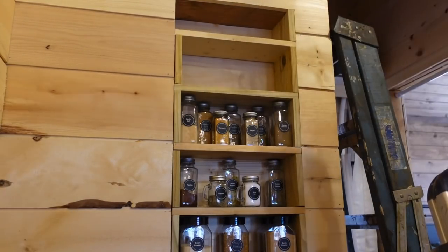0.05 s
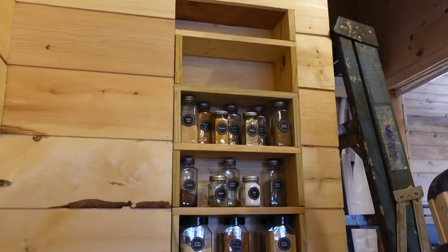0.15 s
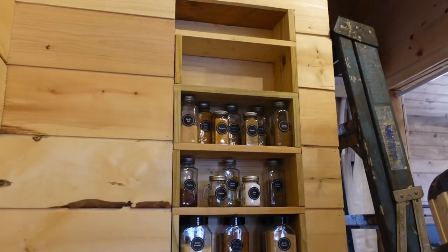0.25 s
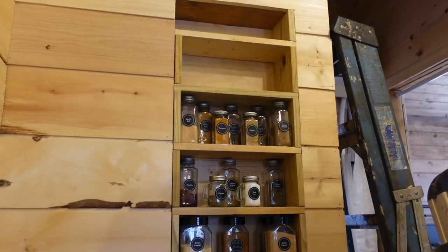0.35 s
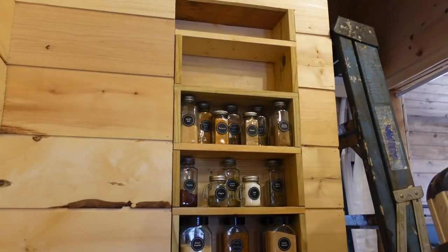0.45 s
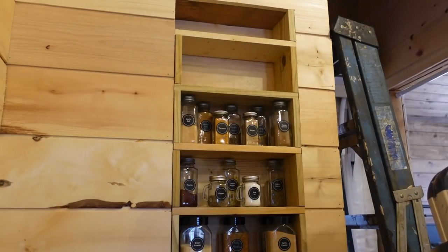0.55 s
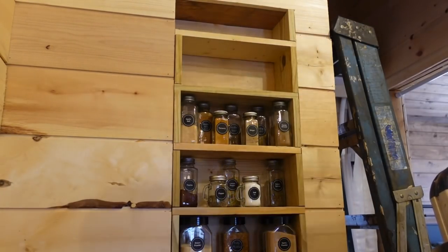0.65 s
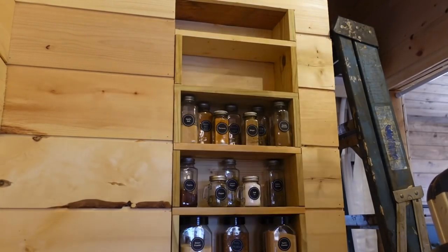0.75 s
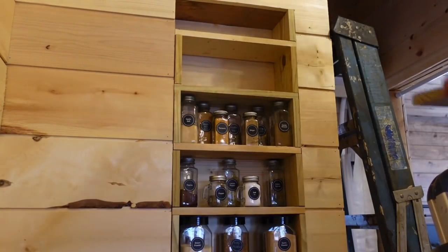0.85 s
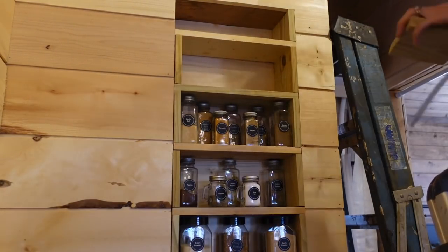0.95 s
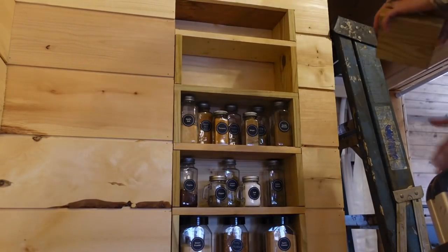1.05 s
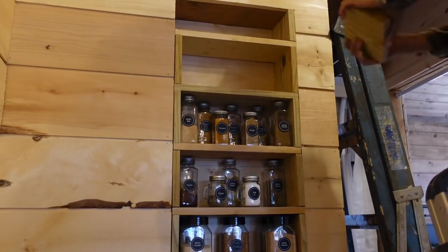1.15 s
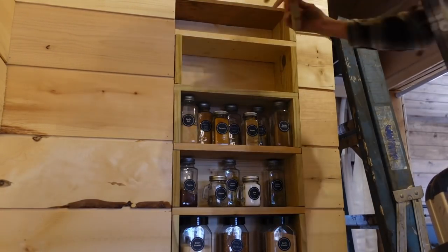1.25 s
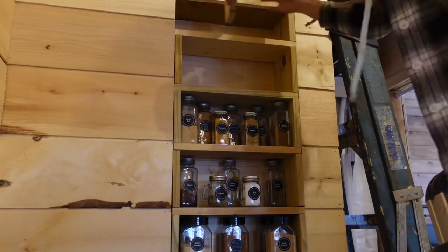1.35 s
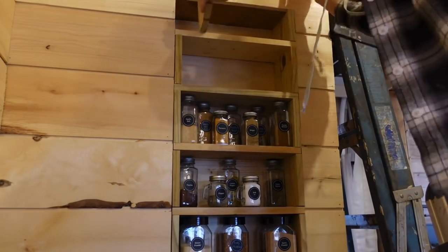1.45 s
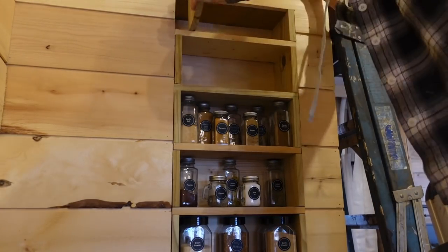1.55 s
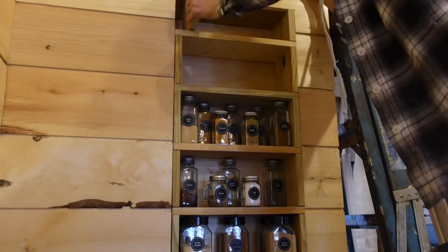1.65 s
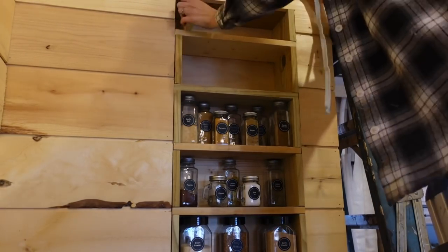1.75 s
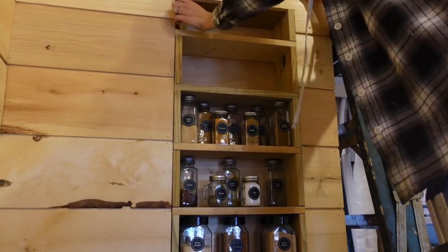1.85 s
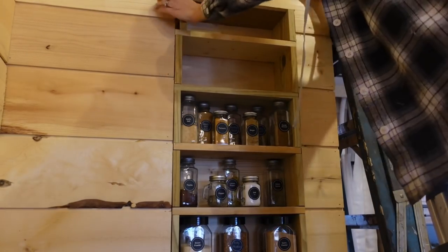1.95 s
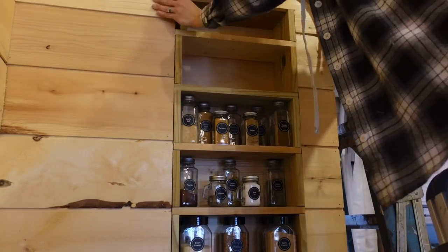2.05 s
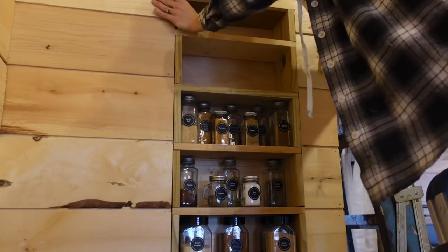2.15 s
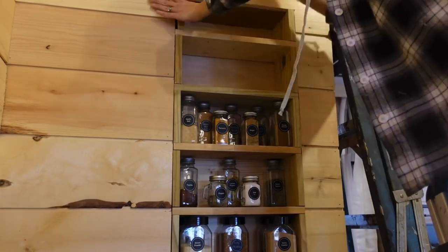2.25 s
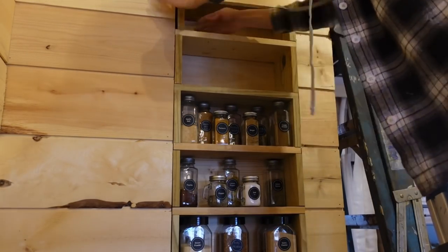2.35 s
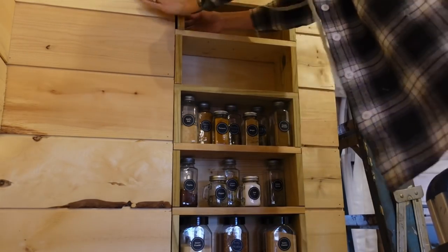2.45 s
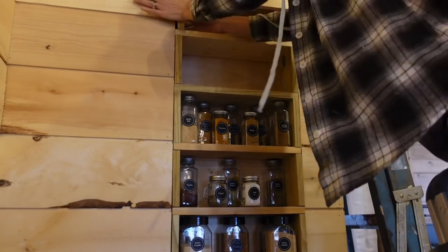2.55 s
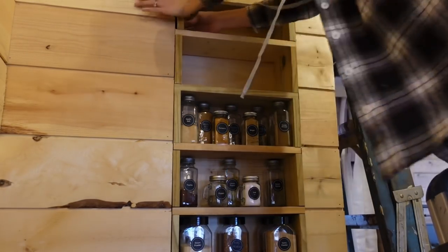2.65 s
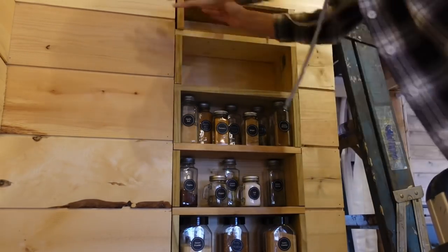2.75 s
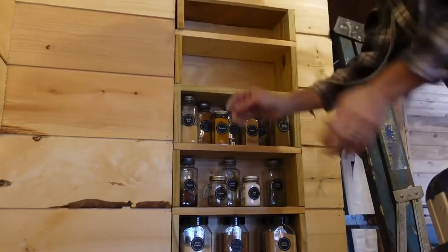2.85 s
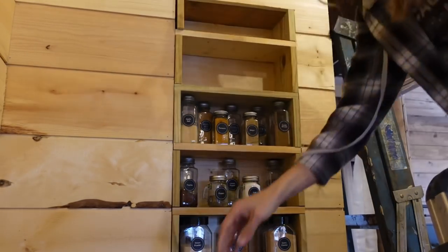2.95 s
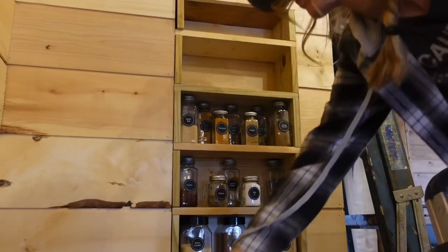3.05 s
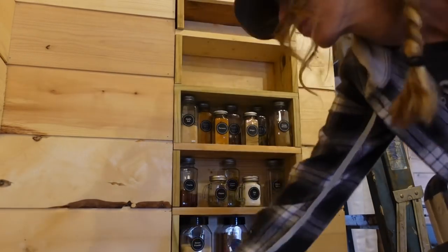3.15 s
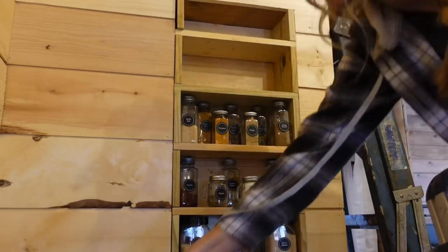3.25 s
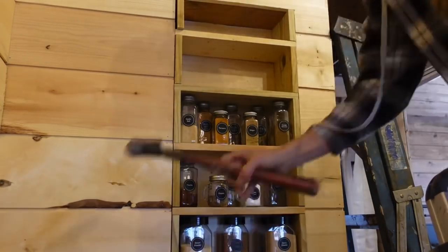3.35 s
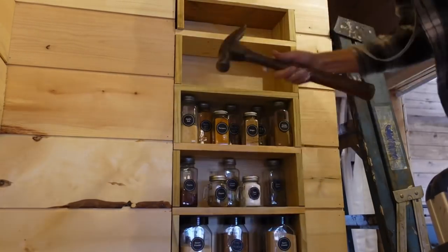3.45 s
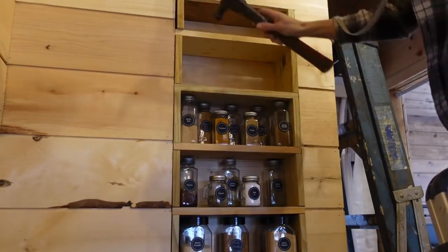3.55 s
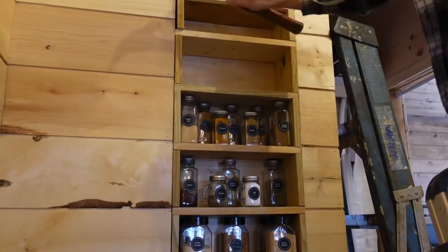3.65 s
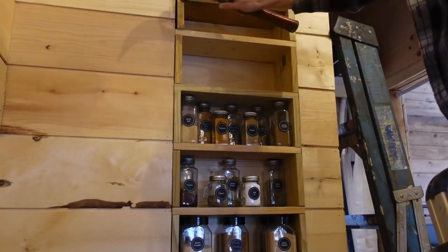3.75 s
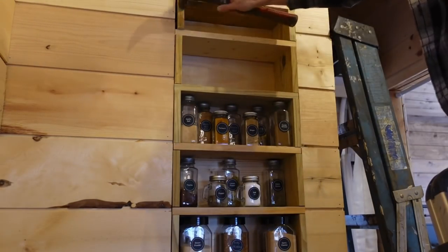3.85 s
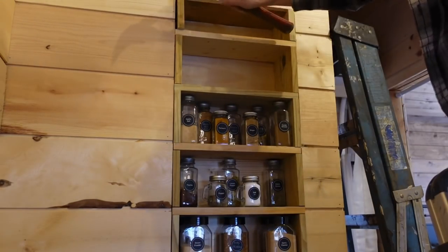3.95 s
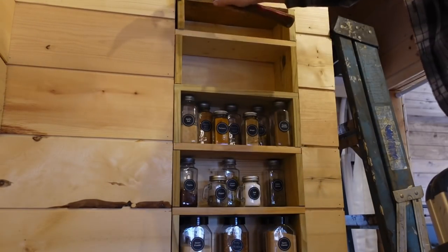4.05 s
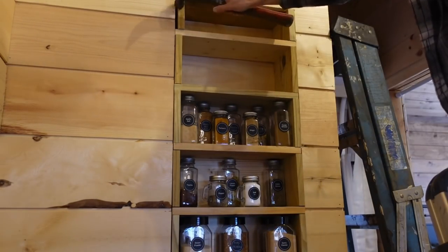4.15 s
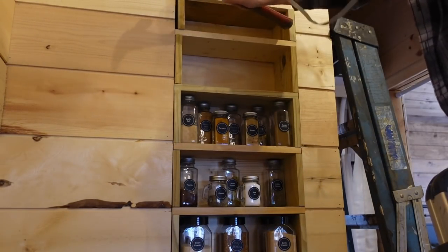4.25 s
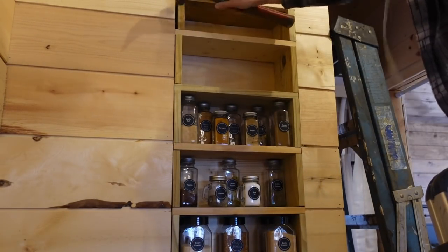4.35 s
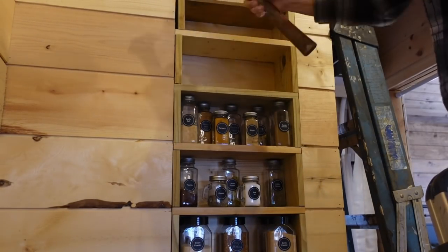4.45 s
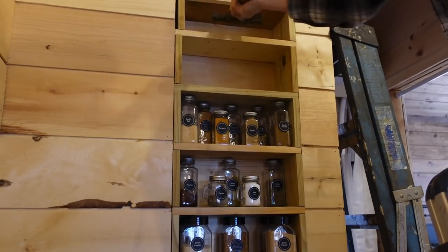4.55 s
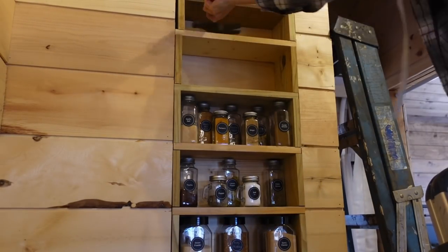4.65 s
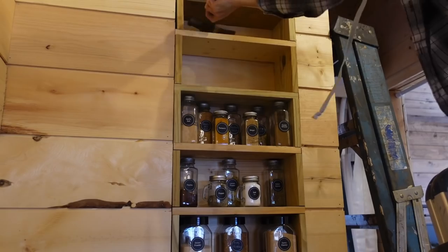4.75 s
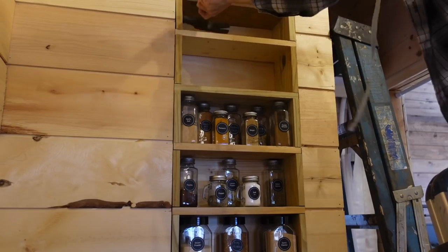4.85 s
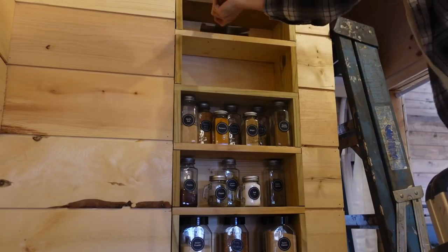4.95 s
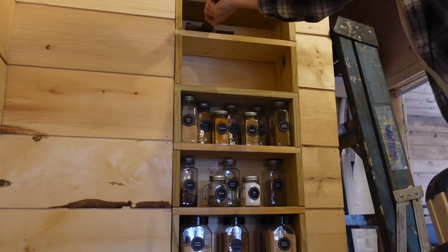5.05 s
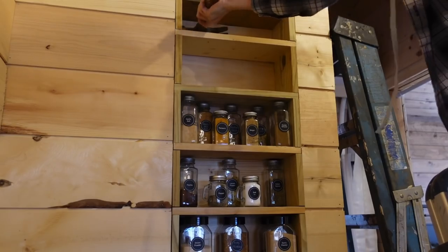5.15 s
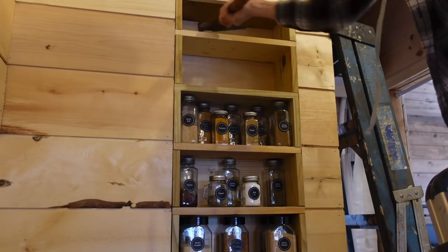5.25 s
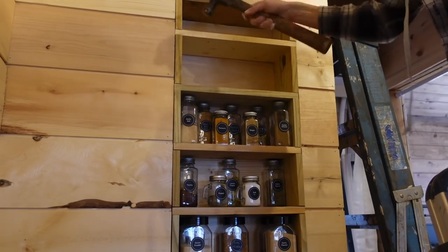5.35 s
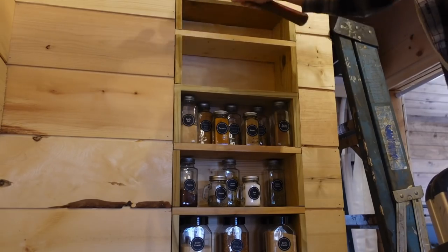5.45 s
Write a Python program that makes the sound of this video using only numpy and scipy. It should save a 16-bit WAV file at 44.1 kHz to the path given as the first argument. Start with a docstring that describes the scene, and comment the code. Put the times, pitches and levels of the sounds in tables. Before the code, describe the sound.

A close microphone in a small, dry, wood-lined room. Under everything are quiet air, a faint low hum and soft rumbles as a person shifts weight. From 0.1 to 1.1 s a loose wooden strip gives muffled, hollow bumps, firmer around 0.6, 0.76 and 1.1, among tiny ticks and sleeve brushes. At 1.5-1.9 s comes a tight cluster of louder wooden clunks with a scrape; short rubs follow near 2.1 and a click and scuff at 2.6. Only light ticks and cloth rustle fill 2.8-3.6. At 3.73 hammering starts abruptly: five heavy blows about 0.15 s apart until 4.33, booming through the wall and overloading the microphone. After a gap, four lighter, brighter, steelier hits fall from 4.7 to 5.19, the last sharpest, with the strip clattering between. Each blow cracks, rings briefly and drops in pitch along the boards. The last ring fades into quiet room air.

```python
"""In a small plank-lined room, close to the microphone, a wooden strip is fitted to the top of a shelf.
It knocks and scrapes into place (struck modes, noise that dies in the room, friction) and sleeves rustle.
Then a hammer drives it home: five heavy blows that shake the wall and four lighter, more metallic ones,
each a crack, ringing modes and clatter, with a falling tone along the boards.
The blows overload the microphone; a faint hum, room air and a low rumble lie underneath."""
import sys
import numpy as np
from scipy import signal
from scipy.fft import rfft, irfft, next_fast_len
from scipy.io import wavfile

SR = 44100
rng = np.random.default_rng(int(sys.argv[2]) if len(sys.argv) > 2 else 0)


def unload_wav(signal):
    """Save mono or channel-first audio to the path in sys.argv[1] as 16-bit WAV at rate SR, clipped to [-1, 1]."""
    wavfile.write(
        sys.argv[1],
        SR,
        np.round(np.clip(np.atleast_2d(signal).T, -1, 1) * 32767).astype(np.int16),
    )


N = 242991
RING_S = np.arange(18000) / SR  # time axis of one struck sound, in seconds

# Hammer blows, close to the microphone. Each row: start in seconds, relative strength in dB,
# brightness in dB per octave, relative wall boom in dB, relative steel ring in dB,
# ping of the struck spot in Hz, ping level in dB.
BLOWS = [(3.73, 2.5, -2.5, 2.5, -33, 384, -7), (3.8767, 5.5, -2.5, 10, -25.5, 3427, -8),
         (4.0177, 9, -0.68, 12, -25.5, 2560, -4.5), (4.1673, 7, -.5, 12, -9.5, 1240, -28),
         (4.333, 6, -1.25, 9, -37.5, 612, -12.5), (4.704, 0.9, -1.34, -5, -0.5, 2055, -4),
         (4.8756, 1.5, -0.07, -3.5, -0.5, 607, -12), (5.0313, -4.5, 1.3, -6.5, -.5, 6760, -20),
         (5.187, 6, 3, -0.5, 2.5, 6700, -5)]
# Modes of wall and shelf. Each row: frequency in Hz, relative level in dB, T60 in seconds.
WALL_MODES = [(53.4, -39, .65), (122.5, -23, .17), (150, -26, .17), (214, -19, .11), (243, -11, .065),
              (300, -15, .07), (378, -13, .06), (433, -23, .16), (505, -23, .08), (590, -21, .07),
              (622, -20, .07), (715, -25, .09), (969, -24, .08), (1086, -24, .1), (1225, -24, .08),
              (1326, -19, .09), (1400, -27, .12), (1564, -22, .09), (1763, -23, .11), (1950, -26, .1),
              (2160, -23, .08), (2480, -22, .1), (2680, -22, .1), (2830, -25, .1), (3236, -23, .07),
              (3320, -22, .08), (3966, -27, .1), (4650, -26, .05), (6300, -28, .05), (9800, -27, .04)]
# Modes of hammer head, nail and the strip that holds it. Each row: frequency in Hz, relative level in dB,
# T60 in seconds.
STEEL_MODES = [(340, -22, .06), (400, -21, .06), (470, -21, .07), (1763, -20, .1), (2190, -19, .07),
               (2284, -14, .085), (2320, -25, .19), (2380, -19, .11), (2478, -25, .13), (2780, -24, .11),
               (3020, -21, .06), (3236, -20, .07), (3900, -24, .06), (4450, -26, .05), (4900, -24, .06),
               (6980, -27, .06), (8700, -30, .06)]
# The crowd of finer resonances in a blow. Each row: frequency in Hz, relative density in dB per Hz.
CLATTER = [(30, -38), (80, -18.5), (130, -11.5), (300, 2.5), (600, 1.5), (820, -1), (1400, 1), (2400, -3.5),
           (3300, -1.5), (4500, -5.5), (7000, -10), (10000, -14), (16000, -26.5)]
# The contact itself. Each row: frequency in Hz, relative density in dB per Hz.
CRACK = [(100, -35), (500, -18.5), (2500, -24.5), (7000, -3.5), (16000, -19.5)]


def hammer(alike=0.62, rise_s=0.000043, wall_db=-5.0, clatter_db=-9, crack_db=-17,
           crack_t60=0.0094, ping_t60=0.031):
    """Each blow is a brief crack, the modes of wall and steel, and a clatter that dies away in the room."""
    out = np.zeros(N)
    same_spot = rng.standard_normal(len(RING_S))
    rise = 1 - np.exp(-RING_S / rise_s)
    for s, strength_db, brightness, boom_db, steel_db, ping_hz, ping_db in BLOWS:
        colour = blow_colour(strength_db, brightness, boom_db)

        # blows land near one another, so they share much of their fine structure
        own_spot = rng.standard_normal(len(RING_S))
        noise = coloured(np.sqrt(alike) * same_spot + np.sqrt(1 - alike) * own_spot, CLATTER)
        clatter = from_db(clatter_db) * dying(tinted(noise, colour), early_t60=0.047, room_db=-12.5)

        contact = coloured(rng.standard_normal(len(RING_S)), CRACK) * fade(crack_t60)
        crack = from_db(crack_db + at_hz(colour, CRACK_HZ)) * contact

        wall = from_db(wall_db) * ringing(WALL_MODES, colour, scatter_db=4.5, spread_s=0.00065)
        flat = [(1, 0.017)]  # one point: the same gain at every frequency
        steel = from_db(steel_db) * ringing(STEEL_MODES, flat, scatter_db=0.5, spread_s=0.0011)
        ping = from_db(ping_db) * np.sin(2 * np.pi * ping_hz * RING_S) * fade(ping_t60)

        echoed = shelf_echoes(rise * (crack + clatter), share=0.12)
        add(out, s, echoed + wall + steel + ping)
    return high_pass(out, hz=49.7)


BOOM_HZ, THUMP_HZ, CLACK_HZ, CRACK_HZ = 55, 285, 1200, 8950  # landmarks of a blow's colour
FLANK_DB_PER_OCTAVE = 1.2  # from thump to crack, the tilt aside, level falls off both sides of the clack
THUMP_FOLLOWS_BOOM = 0.16  # share of the wall's boom that carries over into the board's thump


def blow_colour(strength_db, brightness, boom_db):
    """A harder contact tilts the blow towards the treble; a blow that shakes the wall also thumps more."""
    octaves = np.log2(np.array([THUMP_HZ, CLACK_HZ, CRACK_HZ]) / CLACK_HZ)
    thump, clack, crack = strength_db + brightness * octaves - FLANK_DB_PER_OCTAVE * abs(octaves)
    thump = thump + THUMP_FOLLOWS_BOOM * (boom_db - strength_db)
    return [(BOOM_HZ, boom_db), (THUMP_HZ, thump), (CLACK_HZ, clack), (CRACK_HZ, crack)]


# The loose strip knocking on the shelf. Each row: start in seconds, relative level in dB,
# centre in Hz, focus on that centre in dB per octave.
KNOCKS = [(0.099, -26.5, 300, 2), (0.174, -21, 220, 32), (0.2963, -15, 199, 2), (0.602, -9, 245, 15.5),
          (.713, -18.5, 500, 3), (.76, -6, 248, 20.5), (1.092, -8, 246, 17), (1.4895, -1, 490, 6),
          (1.563, -2.5, 670, 8), (1.686, 0, 680, 22), (1.7307, -4.5, 400, 2), (1.868, -23.5, 1100, 6),
          (2.607, -27.5, 1000, -7), (2.81, -19.5, 470, 36), (4.732, -3, 800, 1), (4.989, -6.5, 485, 8),
          (5.051, 0.5, 600, 0.5), (5.0837, -1, 650, 8)]
# Modes of the strip. Each row: frequency in Hz, relative level in dB, T60 in seconds.
STRIP_MODES = [(229, -30.5, 0.054), (306, -29, 0.046), (421, -32, 0.11), (508.6, -25, 0.07),
               (604.6, -26, 0.069), (712, -39, 0.091), (1125, -42, 0.13), (1660, -50, 0.0504)]
# The strip's finer resonances. Each row: frequency in Hz, relative density in dB per Hz.
STRIP_CLATTER = [(40, -42), (120, -10.5), (220, -8), (550, -11.5), (850, -9.5), (1400, -10.5),
                 (3000, -14.5), (6000, -33.5), (16000, -43)]


def knocks(clatter_db=-26, soft_rise_s=0.0099):
    """The strip bumps the shelf; each place of contact favours its own pitch, and gentle bumps start softly."""
    out = np.zeros(N)
    for s, db, centre_hz, focus in KNOCKS:
        colour = [(hz, -focus * abs(np.log2(hz / centre_hz))) for hz, _ in STRIP_CLATTER]
        noise = coloured(rng.standard_normal(len(RING_S)), STRIP_CLATTER)
        clatter = from_db(clatter_db) * dying(tinted(noise, colour), early_t60=0.069, room_db=-5.5)
        body = ringing(STRIP_MODES, colour, scatter_db=1.5, spread_s=0.00056)
        softness = np.clip(-db / 25, .05, 1)
        rise = 1.5 - np.exp(-RING_S / (soft_rise_s * softness))  # gain from 0.5 towards 1.5
        add(out, s, from_db(db) * rise * (body + clatter))
    return high_pass(out, hz=147)


# Bending waves in the long boards, set off by leaning and pushing. Each row: start in seconds,
# length in seconds, first pitch in Hz, last pitch in Hz, level in dB before the flutter.
BENDS = [(.795, 0.19, 92.8, 61, -47), (1.085, .22, 98, 59, -41.5), (1.576, 0.097, 480, 376, -41.5),
         (1.631, 0.07, 380, 143, -41.5)]
# every hammer blow sends a like wave along the boards, a little different each time
BLOW_BEND_DELAY_S, BLOW_BEND_S = .008, .115  # length before scatter
BLOW_BEND_FROM_HZ, BLOW_BEND_TO_HZ, BLOW_BEND_DB = 210, 67, -38.5  # pitches before scatter
BEND_SCATTER = 0.073  # share of length and pitch
BEND_FLUTTER, BEND_FLUTTERS_PER_S = 0.46, 70  # share of height; rate of random points


def bends():
    """A bending wave arrives highs first: a short falling tone, fluttering as it crosses its reflections."""
    out, waves = np.zeros(N), list(BENDS)
    for s, *_ in BLOWS:
        stretch, pitch = np.exp(BEND_SCATTER * rng.standard_normal(2))
        from_hz, to_hz = BLOW_BEND_FROM_HZ * pitch, BLOW_BEND_TO_HZ * pitch
        waves.append((s + BLOW_BEND_DELAY_S, BLOW_BEND_S * stretch, from_hz, to_hz, BLOW_BEND_DB))
    for s, length, from_hz, to_hz, db in waves:
        hz = np.geomspace(from_hz, to_hz, int(length * SR))
        tone = np.sin(2 * np.pi * np.cumsum(hz) / SR)
        add(out, s, from_db(db) * np.hanning(len(hz)) * tone)
    return out * (1 + BEND_FLUTTER * wander(BEND_FLUTTERS_PER_S))


# The strip sliding over the boards. Each row: start in seconds, length in seconds,
# level in dB before the layer's trim.
SLIDES = [(1.57, 0.28, -46.5), (1.745, 0.068, -36.5), (2.066, 0.067, -37), (2.13, 0.031, -41.5),
          (2.18, 0.019, -44), (2.535, 0.053, -51.5), (2.594, 0.016, -32.5), (3.185, .04, -51.5)]
# Colour of wood on wood. Each row: frequency in Hz, relative density in dB per Hz.
SLIDE_COLOUR = [(80, -10), (200, -1), (450, 0), (800, -3), (1150, -3), (1340, 1.5), (1500, -3),
                (2500, -7.5), (3500, -11), (6000, -19), (10000, -21), (16000, -37.5)]


def slides(trim_db=-1):
    """Wood slides on wood: friction noise that swells as a push takes hold, then slows and stops."""
    push = strokes(SLIDES, attack_s=0.013, sag_db_per_s=78, release_db_per_s=452)
    rub = friction(SLIDE_COLOUR, grains_per_s=1500, grain_db=-7, catch_db=1.5)
    return from_db(trim_db) * push * shelf_echoes(rub, share=0.41)


# Light ticks of buttons and tools. Each row: start in seconds, level in dB before the layer's trim.
TICKS = [(0.331, -38), (.597, -42), (0.7558, -37), (1.181, -42.5), (1.256, -44), (1.916, -44), (1.973, -45),
         (2.026, -46), (2.601, -31.5), (2.7496, -43), (3.078, -42.5), (3.1681, -35), (3.384, -34.5),
         (3.5892, -47.5), (4.638, -44.5)]
# Colour of a tick. Each row: frequency in Hz, relative density in dB per Hz.
TICK_COLOUR = [(300, -10), (1500, -3.5), (4000, 2), (8000, -2.5), (12000, -6.5), (16000, -5)]


def ticks(trim_db=-7):
    """Small hard touches: short noise bursts, heard mostly through the room."""
    out = np.zeros(N)
    for s, db in TICKS:
        noise = coloured(rng.standard_normal(len(RING_S)), TICK_COLOUR)
        add(out, s, from_db(db + trim_db) * dying(noise, early_t60=0.011, room_db=-5))
    return out


# Shirt sleeves brushing. Each row: start in seconds, length in seconds, level in dB before the layer's trim.
SLEEVES = [(.26, 0.037, -49.5), (.586, 0.026, -37), (.7, 0.061, -50.5), (1.54, 0.014, -51),
           (1.62, 0.14, -52.5), (1.735, 0.066, -51), (2.066, 0.094, -43.5), (2.595, 0.011, -40),
           (3.16, 0.022, -48), (3.27, .04, -56), (3.379, 0.011, -40.5)]
# Colour of the cloth. Each row: frequency in Hz, relative density in dB per Hz.
SLEEVE_COLOUR = [(710, -49.5), (1200, -2.5), (2950, -2), (5130, -4), (6030, 5), (8260, -2), (11700, 4.5),
                 (16000, -10)]


def sleeves(trim_db=-4):
    """Cloth brushes: grainy friction noise under short strokes; between them, faint random swells of hiss come
    and go."""
    brush = strokes(SLEEVES + faint_hisses(), attack_s=0.0086, sag_db_per_s=83, release_db_per_s=350)
    rub = friction(SLEEVE_COLOUR, grains_per_s=2200, grain_db=-3)
    return from_db(trim_db) * brush * shelf_echoes(rub, share=0.19)


def faint_hisses(count=18, until_s=3.4, length_s=0.053, mean_db=-57.5, scatter_db=1):
    """Faint short swells of hiss at random times: start in seconds, length in seconds, dB before the trim."""
    rows = []
    for k in range(count):
        start = until_s * (k + rng.random()) / count
        length = length_s * rng.uniform(.5, 1.84)
        rows.append((start, length, mean_db + scatter_db * rng.standard_normal()))
    return rows


# Shifts of weight, each a low swell. Each row: middle in seconds, length in seconds,
# level in dB before the layer's trim.
SHIFTS = [(.08, 0.43, -46.5), (.45, 0.53, -41.5), (.83, 0.56, -46.5), (1.19, 0.39, -53), (2.62, 0.16, -43),
          (2.68, 0.38, -49.5), (3.3, 0.64, -57.5)]
# Colour of the rumble. Each row: frequency in Hz, relative density in dB per Hz.
RUMBLE_COLOUR = [(8.8, -28.5), (15, -10.5), (32, 14), (48, -8), (75, 0), (140, -11), (161, -45.5),
                 (200, -13), (260, -44), (440, -120)]


def rumble(rest_db=-62, trim_db=-3):
    """Shifting weight rumbles: low noise at a faint resting level, with slow swells."""
    gain = from_db(rest_db) + swells(SHIFTS)
    return from_db(trim_db) * gain * coloured(rng.standard_normal(N), RUMBLE_COLOUR)


# The hum in the room. Each row: frequency in Hz, level in dB rms.
HUM = [(76, -66.5), (241, -76.5), (371, -74.5)]
# Colour of the still air. Each row: frequency in Hz, relative density in dB per Hz.
AIR = [(12, -17), (20, 3.5), (74, -4), (120, -12.5), (163, -19.5), (357, -14.5), (849, -24), (1330, -24.5),
       (1660, -22.5), (3070, -25), (6360, -30), (14700, -40), (16000, -42)]


def background(air_db=-62):
    """Still room air as steady noise, with a faint hum of steady sines."""
    out = from_db(air_db) * coloured(rng.standard_normal(N), AIR)
    for hz, db in HUM:
        cycles = hz * np.arange(N) / SR + rng.random()
        out += from_db(db) * np.sqrt(2) * np.sin(2 * np.pi * cycles)
    return out


# How long the room rings. Each row: frequency in Hz, T60 in seconds.
ROOM_T60 = [(60, 0.91), (150, 0.34), (400, 0.18), (900, .16), (2400, 0.2), (6000, 0.14), (16000, 0.16)]


def dying(noise, early_t60, room_db):
    """Dense vibration dies fast in the wood and lingers in the room, longest in the bass."""
    octave = np.log2(np.clip(np.fft.rfftfreq(len(noise), 1 / SR), 2 ** 6, 2 ** 14))
    spectrum, early, out = rfft(noise), fade(early_t60), 0
    for k in range(6, 15):  # overlapping octave bands, 64 Hz to 16 kHz
        band = irfft(spectrum * np.maximum(1 - abs(octave - k), 0))
        late = from_db(room_db) * fade(at_hz(ROOM_T60, 2 ** k))
        out = out + band * np.hypot(early, late)
    return out


def ringing(modes, colour, scatter_db, spread_s):
    """Struck modes; each has a strength of its own and arrives by a slightly different path."""
    out = np.zeros(len(RING_S))
    for hz, db, t60 in modes:
        lag = int(rng.random() * spread_s * SR)
        swing = np.cos(2 * np.pi * hz * RING_S) * fade(t60)
        gain = from_db(db + at_hz(colour, hz) + scatter_db * rng.standard_normal())
        out[lag:] += gain * swing[:len(out) - lag]
    return out


def friction(spectrum, grains_per_s, grain_db, catch_db=1.3, catches_per_s=170):
    """Tiny slips over a bed of hiss, unevenly catching and letting go; rms 1."""
    slips = (rng.random(N) < grains_per_s / SR) * rng.standard_normal(N)
    rub = rng.standard_normal(N) + from_db(grain_db) * rms_one(slips)
    return coloured(rub * from_db(catch_db * wander(catches_per_s)), spectrum)


def wander(points_per_s):
    """Random curve: straight lines between normally distributed points."""
    return np.interp(np.arange(N) * points_per_s / SR, np.arange(N), rng.standard_normal(N))


def shelf_echoes(x, share, count=5):
    """The shelf's boards throw back echoes within a few ms and comb the sound."""
    out = x.copy()
    for lag in (rng.uniform(.0004, .004, count) * SR).astype(int):
        out[lag:] += share * rng.choice([-1, 1]) * x[:len(x) - lag]
    return out / np.sqrt(1 + count * share ** 2)


def strokes(rows, attack_s, sag_db_per_s, release_db_per_s):
    """Gain of rubbing strokes: each swells, sags while it lasts and dies away; overlaps add in power."""
    t, power = np.arange(N) / SR, 0
    for s, length, db in rows:
        age = np.maximum(t - s, 0)
        fall_db = sag_db_per_s * age + release_db_per_s * np.maximum(age - length, 0)
        gain = np.minimum(age / attack_s, 1) * from_db(db - np.minimum(fall_db, 120))
        power = power + gain ** 2
    return np.sqrt(power)


def swells(rows):
    """Gain of slow swells that rise and fall evenly."""
    t = np.arange(N) / SR
    return sum(from_db(db) * np.cos(np.pi * np.clip((t - s) / length, -.5, .5)) ** 2 for s, length, db in rows)


def high_pass(x, hz):
    """Small boards radiate little bass."""
    return signal.sosfilt(signal.butter(2, hz, "high", fs=SR, output="sos"), x)


def coloured(x, spectrum):
    """Give noise a spectrum; rms 1."""
    size = next_fast_len(len(x))
    hz = np.fft.rfftfreq(size, 1 / SR)
    return rms_one(irfft(rfft(x, size) * from_db(at_hz(spectrum, hz)), size)[:len(x)])


def tinted(x, colour):
    """Filter a struck sound by a colour in dB, letting its level change."""
    hz = np.fft.rfftfreq(len(x), 1 / SR)
    return irfft(rfft(x) * from_db(at_hz(colour, hz)))


def fade(t60):
    """Exponential decay of a ring."""
    return np.exp(-np.log(1000) * RING_S / t60)


def at_hz(points, hz):
    """Read a spectrum on a log-frequency axis."""
    f, value = np.transpose(points)
    return np.interp(np.log(np.maximum(hz, 1)), np.log(f), value)


def from_db(db):
    """Decibels to gain."""
    return 10 ** (np.asarray(db) / 20)


def rms_one(x):
    """Scale to unit power."""
    return x / np.sqrt(np.mean(x ** 2) + 1e-20)


def add(out, s, sound):
    """Mix a sound in at time s."""
    at = int(round(s * SR))
    out[at:at + len(sound)] += sound[:N - at]


def scene():
    """Everything at one microphone."""
    blows = hammer() + bends()
    handling = knocks() + slides() + ticks() + sleeves() + rumble()
    return (blows + handling + background())[None]


def record(dry):
    """The close microphone overloads, flattening the loudest peaks, and the top is cut."""
    clipped = dry / (1 + dry ** 8) ** (1 / 8)
    low_pass = signal.ellip(10, .2, 70, 16100, fs=SR, output="sos")  # cutoff in Hz
    return signal.sosfilt(low_pass, clipped)


dry = scene()
out = record(dry)
unload_wav(out)
```